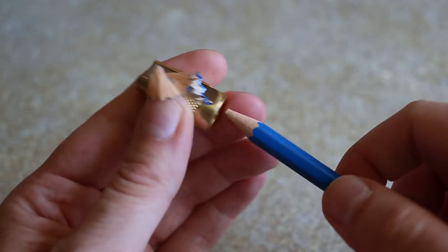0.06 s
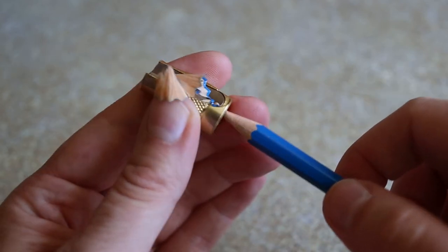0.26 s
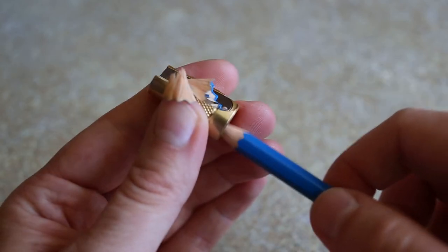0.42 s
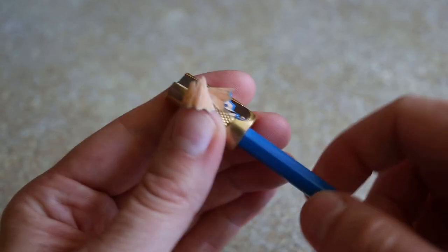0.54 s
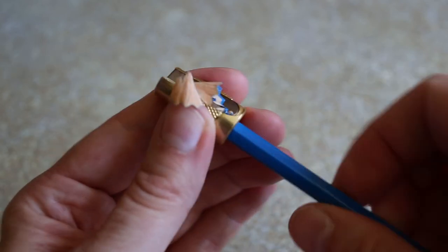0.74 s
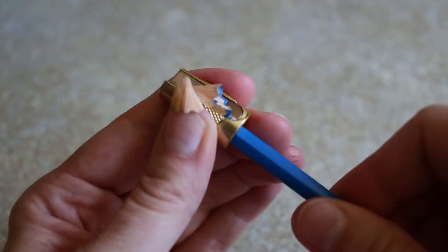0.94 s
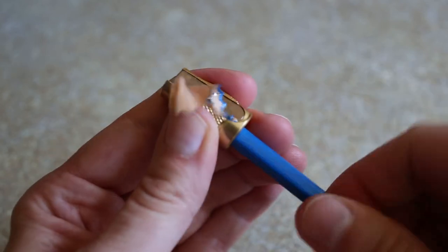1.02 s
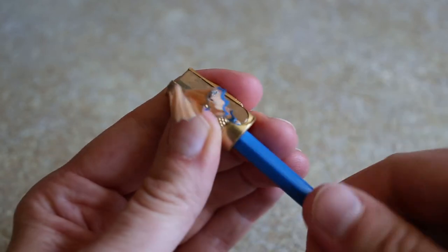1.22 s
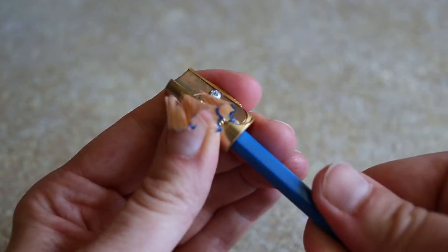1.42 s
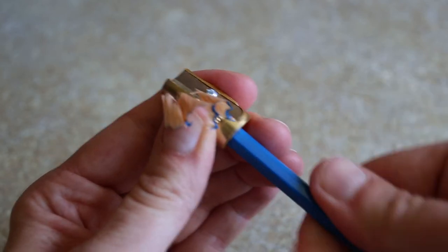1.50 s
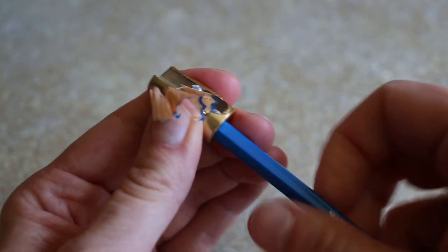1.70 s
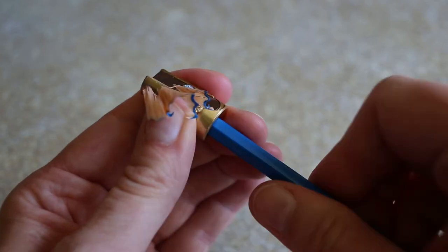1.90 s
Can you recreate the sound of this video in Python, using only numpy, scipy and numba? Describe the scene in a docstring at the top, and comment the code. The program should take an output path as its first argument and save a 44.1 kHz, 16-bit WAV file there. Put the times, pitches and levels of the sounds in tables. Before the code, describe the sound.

Close to the microphone, a pencil sharpener shaves wood: light ticks as the tip enters, a short crackling scrape, then thin rubbing as the grip changes. Soft microphone rumble and an appliance hum sit in the quiet room.

```python
"""A quiet room, close up: a pencil goes into a small hand-held metal sharpener and gets one twist.
The tip taps and scrapes into the bore, the wood rubs the cone, and the blade crackles through the
grain and tears off a shaving. Thin friction swishes glide as the fingers change grip.
Behind it: low handling rumble, an appliance hum and room air."""
import sys
import numpy as np
from scipy import signal
from scipy.fft import rfft, irfft
from scipy.io import wavfile
from numba import njit

SR = 44100
rng = np.random.default_rng(int(sys.argv[2]) if len(sys.argv) > 2 else 0)


def store_pcm(level_fs):
    """Save levels as 16-bit WAV."""
    pcm = np.round(np.clip(level_fs, -1, 1) * 32767).astype(np.int16)
    wavfile.write(sys.argv[1], SR, np.atleast_2d(pcm).T)


N = 85995

# steady cutting: time_s, level_db
CUT_LEVEL = [(0.83, -85), (0.87, -53.5), (0.89, -63), (0.925, -57.5), (0.96, -56), (1.0, -55.5),
             (1.04, -54), (1.1, -53.5), (1.15, -54), (1.21, -49), (1.25, -54), (1.3, -56.5), (1.355, -52),
             (1.4, -57.5), (1.46, -59), (1.485, -70), (1.53, -71)]
# spectrum of the cut: freq_hz, gain_db
CUT_COLOUR = [(600, 4.5), (1500, -6.5), (2400, -4.5), (3200, -2.5), (5200, 0.5), (6800, -5.5), (8000, -0.5),
              (9200, 1), (11200, 3.5), (13000, 0.5), (15800, 2)]
# single fibres snapping: peak_s, level_db
SNAPS = [(0.863, -46), (0.876, -40), (0.9037, -44.5), (0.9152, -51), (0.9337, -44), (0.9499, -42),
         (0.9715, -46), (1.052, -44), (1.075, -41.5), (1.101, -46), (1.166, -42), (1.1816, -37),
         (1.188, -37), (1.2224, -42), (1.294, -45), (1.3095, -38.5), (1.3194, -38.5), (1.4385, -35)]
# shaving tears: peak_s, level_db, rise_s, fall_s, ring_hz, ring_db
TEARS = [(0.974, -49, 0.003, 0.012, 11600, 1), (0.99, -50.5, 0.0029, .005, 12600, -2),
         (1.187, -41, 0.0083, 0.013, 10800, -0.5), (1.233, -54, .01, 0.0055, 10600, -4),
         (1.323, -41, 0.0055, 0.0049, 10140, -0.5), (1.334, -43, 0.0081, 0.003, 13400, -6),
         (1.443, -40.5, 0.01, 0.0085, 5270, -10.5)]
# tear spectrum: freq_hz, gain_db
TEAR_COLOUR = [(1500, 0), (2300, -3.5), (3000, 3), (4200, 7.5), (5500, 5.5), (6700, -8), (8000, 6.5),
               (9500, 5.5), (12200, 4.5), (13500, 10), (15800, -1)]
# tip knocks on metal: peak_s, level_db, pitch_hz, ring_db, tilt_db_per_octave
TAPS = [(0.2123, -44.5, 1430, -9.5, 4), (0.5783, -40.5, 1860, -11, -8), (0.5814, -52, 2050, -11, -2),
        (0.598, -54, 2100, -3, 6)]
# contact crack spectrum: freq_hz, gain_db
CRACK_COLOUR = [(1100, 14), (2100, 0), (3200, -14), (4200, 7.5), (6000, -17), (9000, -21), (15800, -26)]
# tip slides in the bore: start_s, length_s, level_db, wood_db, tilt_db_per_octave
SLIDES = [(0.435, 0.03, -62, -5.5, 5.5), (0.548, 0.02, -67, -2, -1.5), (0.579, 0.016, -59.5, 1.5, 1.5),
          (0.599, 0.009, -61, -1, 6)]
# tip and bore resonances: centre_hz, width_hz, gain_db
BORE_MODES = [(2200, 1600, -3), (4040, 710, 5), (6440, 630, 2), (9380, 800, 1.5), (12500, 610, -17)]
# wood seating in the cone: time_s, level_db
SEAT_LEVEL = [(0.72, -83), (0.79, -61.5), (0.825, -69), (0.87, -62.5), (0.95, -77)]
# seating spectrum: freq_hz, gain_db
SEAT_COLOUR = [(800, -11), (2000, 2.5), (3700, 8.5), (5200, 0), (11000, -6.5), (15800, -13)]
# friction glides, one list per swish: time_s, centre_hz, width_hz, level_db
SWISHES = [
    [(0.85, 3700, 700, -73), (0.89, 4070, 700, -67), (0.93, 4200, 700, -71), (0.98, 4860, 600, -64),
     (1.03, 4900, 600, -67), (1.12, 5340, 600, -79)],
    [(1.11, 3040, 600, -71), (1.17, 3170, 800, -64), (1.215, 3650, 704, -56.5), (1.26, 4320, 484, -55),
     (1.29, 4260, 480, -58), (1.35, 4050, 392, -72), (1.42, 4060, 400, -68), (1.44, 3940, 400, -64)],
    [(1.37, 5160, 500, -71), (1.41, 5240, 450, -57), (1.48, 5400, 910, -63.5), (1.555, 5060, 800, -73),
     (1.59, 5000, 398, -60.5), (1.615, 4700, 500, -55.5), (1.655, 4500, 650, -56.5), (1.70, 4700, 646, -65),
     (1.785, 4940, 450, -63), (1.81, 5470, 1960, -62.5), (1.9, 5270, 1500, -74)],
    [(1.67, 4240, 700, -68), (1.74, 3880, 750, -61), (1.775, 3130, 550, -63.5), (1.82, 3050, 700, -70.5)],
    [(1.9, 3380, 600, -78), (1.93, 3870, 420, -59.5), (1.95, 4120, 330, -58)],
]
# loose shaving rustles: peak_s, level_db, fall_s
RUSTLES = [(1.606, -55.5, 0.0037), (1.615, -59, .004), (1.643, -54.5, 0.002), (1.77, -65, .003)]
# rustle spectrum: freq_hz, gain_db
RUSTLE_COLOUR = [(1200, 17), (2000, -3), (3500, -6), (6500, -6), (8500, 4.5), (13000, 0), (15800, -8)]
# hand brushing the pencil: time_s, level_db
BRUSH_LEVEL = [(1.46, -70), (1.53, -69), (1.59, -71.5), (1.645, -67), (1.69, -71.5), (1.74, -66),
               (1.83, -72.5), (1.95, -69)]
# brush spectrum: freq_hz, gain_db
BRUSH_COLOUR = [(900, -11), (2000, 11), (2700, -7), (3500, 7.5), (5500, -13), (15000, -16)]
# stereo image of the sharpener: freq_hz, left_minus_right_db, side_db
SCATTER = [(1000, -2.5, -35), (2500, -1, -31), (4800, 0, -22), (6500, -2.5, -1.5), (9100, 5.5, -8),
           (11400, -0.5, -6.5), (15000, 2, -3)]
# handling rumble: time_s, level_db
RUMBLE_LEVEL = [(0, -59), (0.17, -70), (0.21, -41), (0.27, -50.5), (0.47, -60), (0.516, -32), (0.56, -69),
                (0.605, -47), (0.65, -53.5), (0.70, -31), (0.745, -25.5), (0.786, -31.5), (0.82, -43),
                (0.852, -31), (1.014, -46.5), (1.064, -35.5), (1.15, -49), (1.24, -35), (1.37, -49.5),
                (1.6, -72), (1.95, -67)]
# appliance hum: pitch_hz, level_db, phase_waver_rad, level_waver_db
HUM_LINES = [(99.6, -49.5, 0.11, 1.1), (118.5, -53, 0.3, 1.2), (439, -65.5, 0.65, 1.5)]
# room air spectrum: freq_hz, gain_db
AIR_COLOUR = [(25, -17), (70, 5), (100, -0.5), (170, 0), (300, -6), (500, -8), (750, -12.5), (1100, -13.5),
              (1700, -21.5), (3000, -28), (6000, -35.5), (11000, -38), (15800, -40.5)]
# room resonances: centre_hz, width_hz, level_db
ROOM_MODES = [(169.7, 21, -63), (233.8, 25, -68), (440, 22, -67.5), (577.7, 7.6, -72)]


def blade():
    """The blade crackles unevenly through the grain; single fibres snap."""
    flicker = undb(2.5 * walk(rate_hz=110))
    cutting = fader(CUT_LEVEL) * flicker * colour(grains(per_s=11000, spread_db=2.5), CUT_COLOUR)
    snaps = sum(undb(db) * burst(peak_s, rise_s=0.00024, fall_s=0.0012) for peak_s, db in SNAPS)
    return cutting + snaps * colour(noise(), CUT_COLOUR)


def shaving():
    """Avalanches of fractures ring the curling shaving."""
    out = 0
    for peak_s, db, rise_s, fall_s, ring_hz, ring_db in TEARS:
        curl = double_ring(grains(per_s=7000, spread_db=3.5), ring_hz, width_hz=1300)
        splinters = colour(grains(per_s=7000, spread_db=3.5), TEAR_COLOUR)
        out += undb(db) * burst(peak_s, rise_s, fall_s) * (splinters + undb(ring_db) * curl)
    return out * undb(1.5 * walk(rate_hz=360))


def tip_taps():
    """Graphite knocks on the metal mouth: damped body tone, contact crack, bore ring."""
    out = 0
    for peak_s, db, pitch_hz, ring_db, tilt_db in TAPS:
        body = np.sin(2 * np.pi * pitch_hz * (clock() - peak_s))
        body *= burst(peak_s, rise_s=0.0001, fall_s=0.0009)
        crack = burst(peak_s, rise_s=0.0001, fall_s=0.00054) * colour(noise(), CRACK_COLOUR)
        metal = burst(peak_s, rise_s=0.00015, fall_s=0.0015) * bore(noise(), tilt_db)
        out += undb(db) * (body + undb(-6.5) * crack + undb(ring_db) * metal)
    return out


def tip_slides(attack_s=0.008, release_s=0.006):
    """The tip scrapes in; its grit excites bore and wood."""
    out = 0
    for start_s, length_s, db, wood_db, tilt_db in SLIDES:
        age_s = clock() - start_s
        envelope = np.clip(age_s / attack_s, 0, 1) * np.exp(-np.maximum(age_s - length_s, 0) / release_s)
        grit = grains(per_s=5000, spread_db=3)
        wood = double_ring(grit, centre_hz=1620, width_hz=2400)
        out += undb(db) * envelope * (bore(grit, tilt_db) + undb(wood_db) * wood)
    return out


def bore(x, tilt_db):
    """The tip rings against the metal bore; tilt_db makes the ring brighter or duller."""
    return unit(sum(undb(db + tilt_db * np.log2(hz)) * ring(x, hz, width_hz)
                    for hz, width_hz, db in BORE_MODES))


def seating():
    """Wood rubs the cone before the blade bites."""
    return fader(SEAT_LEVEL) * colour(grains(per_s=4000, spread_db=4), SEAT_COLOUR)


def swishes(rub_db=-13, rub_width_hz=1700):
    """Skin on the pencil: friction through a narrow gliding resonance, inside a broader rub."""
    out = 0
    for rows in SWISHES:
        time_s, centre_hz, width_hz, _ = np.array(rows).T
        centre_hz = np.interp(clock(), time_s, centre_hz)
        width_hz = np.interp(clock(), time_s, width_hz)
        swish = noise()
        for _ in range(4):
            swish = bandpass(swish, centre_hz, 2 * width_hz)
        rub = grains(per_s=3000, spread_db=0)
        for _ in range(3):
            rub = bandpass(rub, centre_hz, rub_width_hz * np.ones(N))
        out += fader(rows) * (unit(swish / np.sqrt(width_hz)) + undb(rub_db) * unit(rub))
    return out


def regrip():
    """The hand brushes along the pencil and stirs the shaving."""
    stirs = sum(undb(db) * burst(peak_s, fall_s / 2, fall_s) for peak_s, db, fall_s in RUSTLES)
    rustle = stirs * colour(grains(per_s=5950, spread_db=3.5), RUSTLE_COLOUR)
    return rustle + fader(BRUSH_LEVEL) * colour(noise(), BRUSH_COLOUR)


def twist():
    """All cutting and rubbing, in stereo; fingers scatter the treble, so the sides partly differ."""
    hz, pan_db, side_db = np.array(SCATTER).T
    mid, side = (rfft(blade() + shaving() + seating() + swishes() + regrip()) for _ in range(2))
    side *= undb(spectrum(hz, side_db))
    pan = undb(spectrum(hz, pan_db) / 2)
    return np.array([irfft((mid + side) * pan, N), irfft((mid - side) / pan, N)])


def reflections(x, decay_s=0.02):
    """Short room echo: a decaying noise tail of unit energy."""
    tail = noise() * np.exp(-clock() / decay_s)
    return signal.fftconvolve(x, tail / np.linalg.norm(tail))[:N]


def rumble(centre_hz=36.12, width_hz=29.6):
    """Handling shakes the microphone in uneven swings, mostly on the right."""
    swing_hz = centre_hz * (1 + 0.18 * walk(rate_hz=18.35))
    swing = unit(np.sin(2 * np.pi * np.cumsum(swing_hz) / SR))
    right = unit(swing + 0.43 * double_ring(noise(), centre_hz, width_hz))
    left = unit(right + double_ring(noise(), centre_hz, width_hz))
    return fader(RUMBLE_LEVEL) * np.array([undb(-10) * left, undb(3) * right])


def hum(waver_hz=11.5):
    """Appliance hum lines waver in phase and level, the lowest least."""
    out = 0
    for hz, db, waver_rad, waver_db in HUM_LINES:
        gain = undb(db + waver_db * walk(waver_hz))
        phase_rad = 2 * np.pi * (hz * clock() + rng.random()) + waver_rad * walk(waver_hz)
        out += gain * np.sqrt(2) * np.sin(phase_rad)
    return out


def air():
    """Soft room noise, droning in a few narrow resonances."""
    drones = sum(undb(db) * double_ring(noise(), hz, 1.5 * width_hz) for hz, width_hz, db in ROOM_MODES)
    return undb(-52) * colour(noise(), AIR_COLOUR) + drones


def place(source, pan_db, unshared):
    """Pan a source, positive to the left; a share of its power differs between the sides."""
    common = source() * np.sqrt(1 - unshared)
    separate = np.array([source(), source()]) * np.sqrt(unshared)
    return (common + separate) * undb(np.array([[pan_db], [-pan_db]]) / 2)


def grains(per_s, spread_db):
    """Dense tiny fractures: random impulses of uneven size."""
    impulses = (rng.random(N) < per_s / SR) * np.sign(noise())
    return unit(impulses * undb(spread_db * np.clip(noise(), -2, 2)))


def burst(peak_s, rise_s, fall_s):
    """Exponential swell and decay."""
    age_s = clock() - peak_s
    return np.exp(np.minimum(age_s / rise_s, -age_s / fall_s))


def fader(rows, edge_s=0.008):
    """Gain from (time_s, ..., level_db) rows, dying away outside them."""
    t, rows = clock(), np.array(rows)
    outside_s = np.abs(t - np.clip(t, rows[0, 0], rows[-1, 0]))
    return undb(np.interp(t, rows[:, 0], rows[:, -1])) * np.exp(-outside_s / edge_s)


def walk(rate_hz):
    """Smooth random drift, rms 1."""
    return unit(irfft(rfft(noise()) / (1 + (bins_hz() / rate_hz) ** 4), N))


def colour(x, points):
    """Shape by (freq_hz, gain_db) points, rolling off below the first; rms 1."""
    hz, db = np.array(points).T
    low_cut = np.minimum(bins_hz() / hz[0], 1) ** 2
    return unit(irfft(rfft(x) * undb(spectrum(hz, db)) * low_cut, N))


def spectrum(hz, values):
    """Points joined on a log-frequency axis."""
    return np.interp(np.log(bins_hz() + 1), np.log(hz), values)


@njit
def bandpass(x, centre_hz, width_hz):
    """State-variable band-pass with moving centre and width."""
    y, band_state, low_state = np.empty(len(x)), 0., 0.
    for i in range(len(x)):
        g, damping = np.tan(np.pi * centre_hz[i] / SR), width_hz[i] / centre_hz[i]
        band = (band_state + g * (x[i] - low_state)) / (1 + g * (g + damping))
        band_state = 2 * band - band_state
        low_state += 2 * g * band
        y[i] = damping * band
    return y


def ring(x, centre_hz, width_hz):
    """One steady resonance, width prewarped."""
    step_rad = 2 * np.pi * centre_hz / SR
    return bandpass(x, centre_hz * np.ones(N), width_hz * step_rad / np.sin(step_rad) * np.ones(N))


def double_ring(x, centre_hz, width_hz):
    """Two equal resonances in series, rms 1."""
    return unit(ring(ring(x, centre_hz, width_hz), centre_hz, width_hz))


def undb(db):
    return 10 ** (np.asarray(db) / 20)


def unit(x):
    return x / np.sqrt(np.mean(x ** 2))


def clock():
    return np.arange(N) / SR


def bins_hz():
    return np.arange(N // 2 + 1) * SR / N


def noise():
    return rng.standard_normal(N)


def scene():
    """Close sharpener with faint reflections, over rumble, hum and air."""
    near = twist() + tip_taps() + tip_slides()
    echo = undb(-7.5) * np.array([reflections(channel) for channel in near])
    room = place(hum, pan_db=-3, unshared=0) + place(air, pan_db=-3.5, unshared=0.5)
    return near + echo + rumble() + room


def record(dry, cutoff_hz=15700):
    """Steep low-pass on the top treble."""
    return signal.sosfilt(signal.ellip(10, 0.2, 80, cutoff_hz, fs=SR, output="sos"), dry)


dry = scene()
out = record(dry)
store_pcm(out)
```